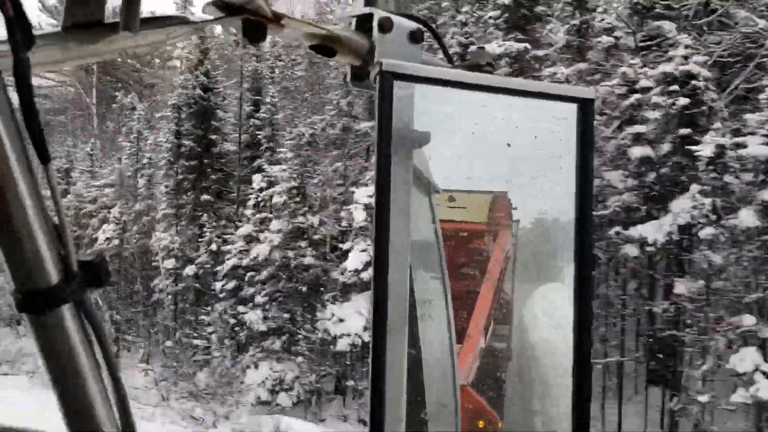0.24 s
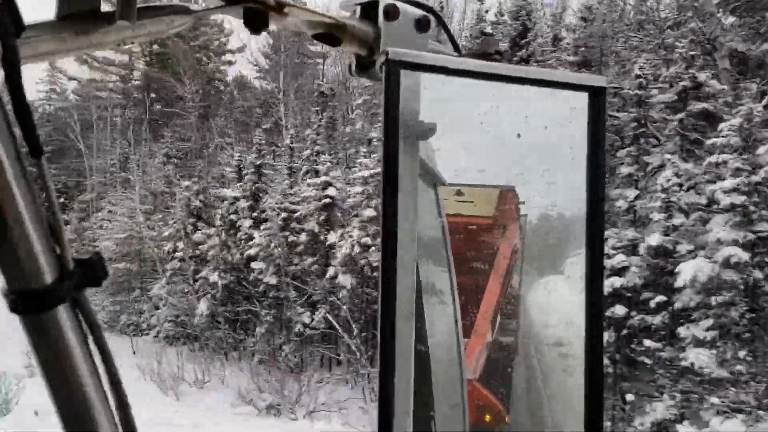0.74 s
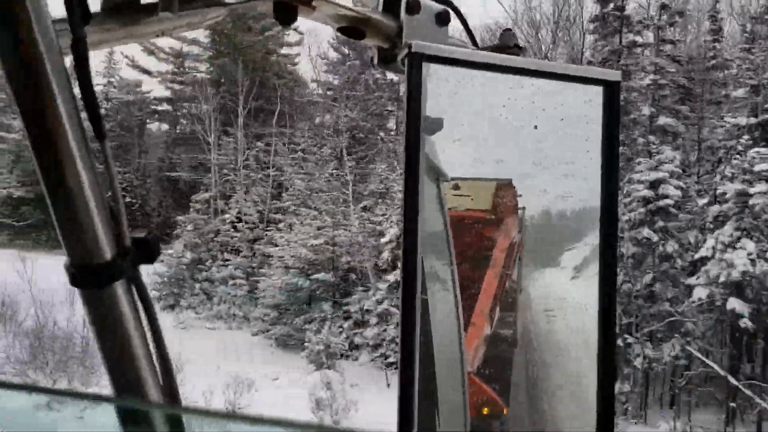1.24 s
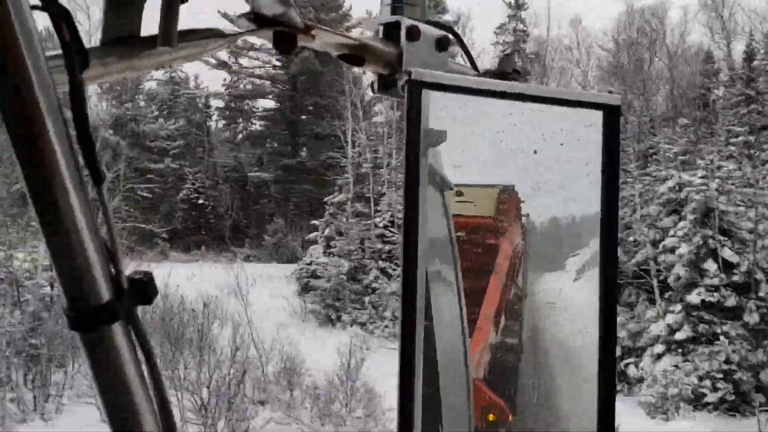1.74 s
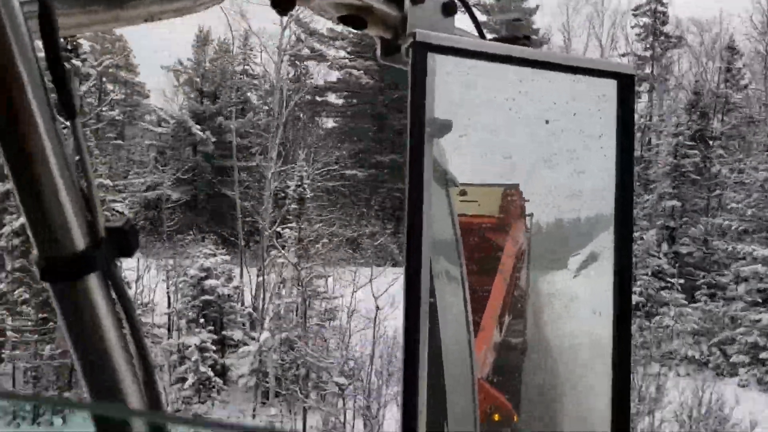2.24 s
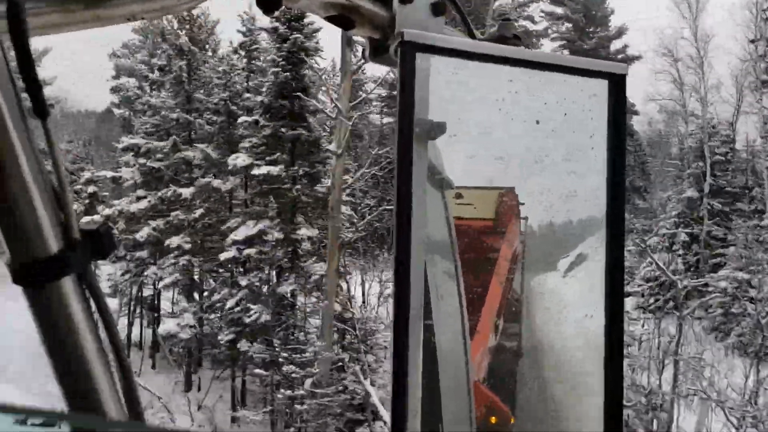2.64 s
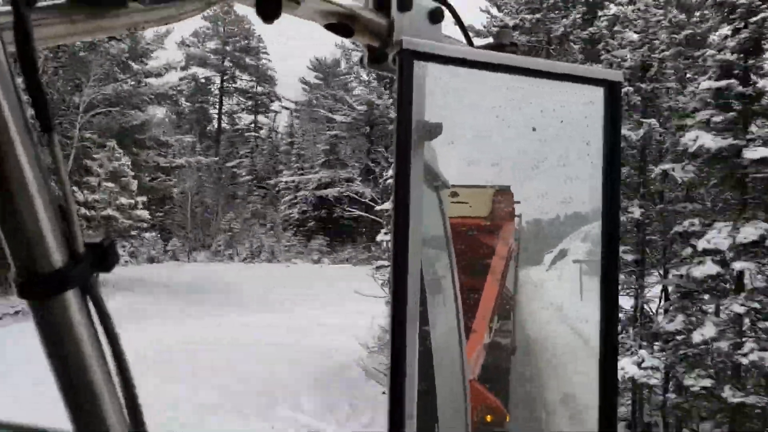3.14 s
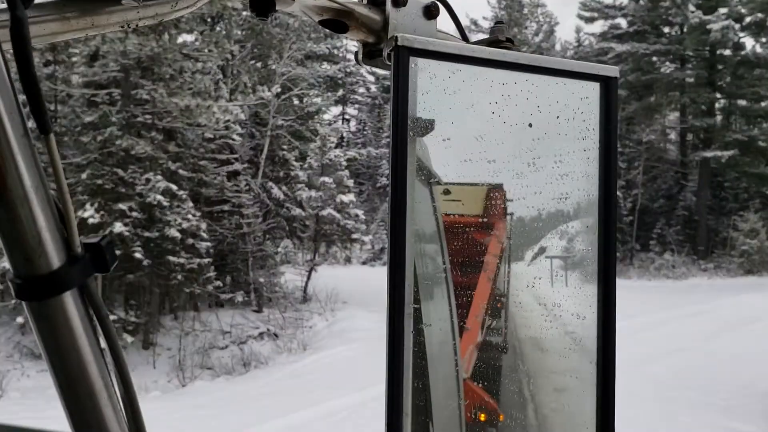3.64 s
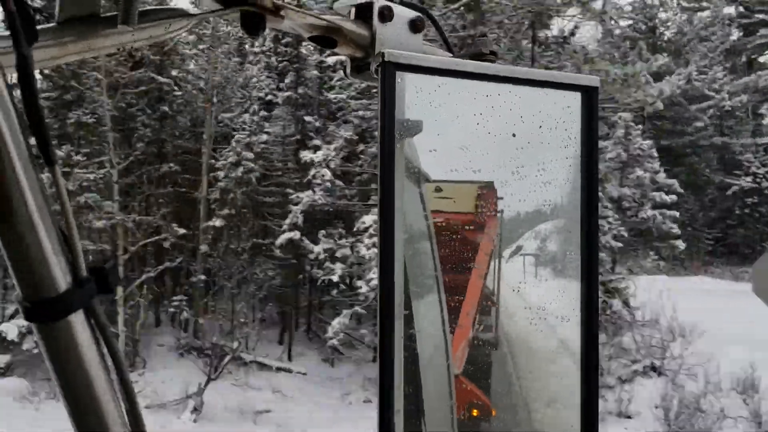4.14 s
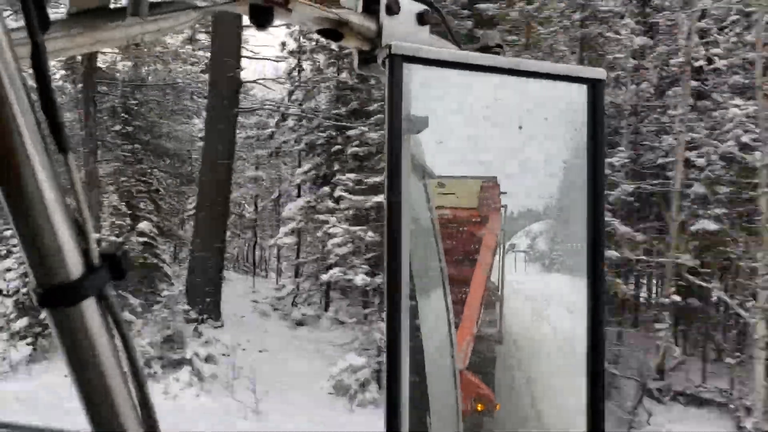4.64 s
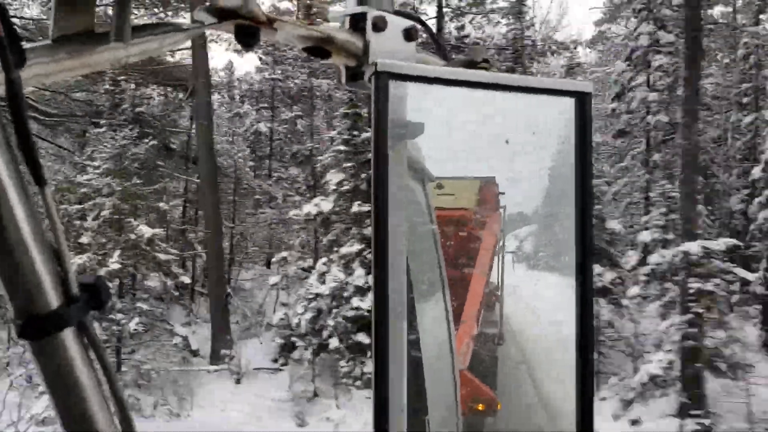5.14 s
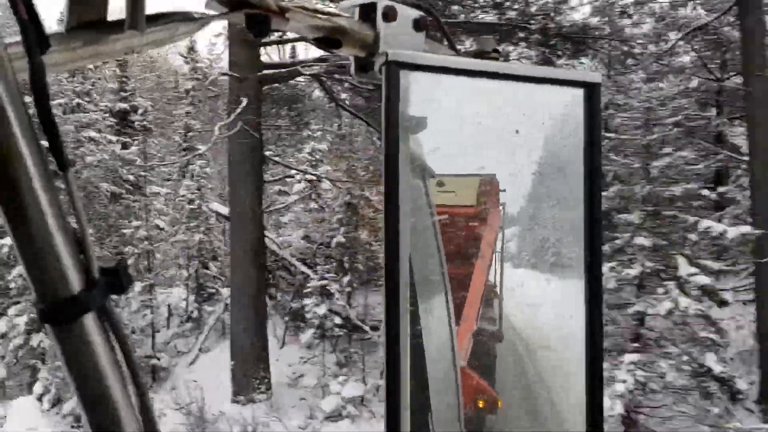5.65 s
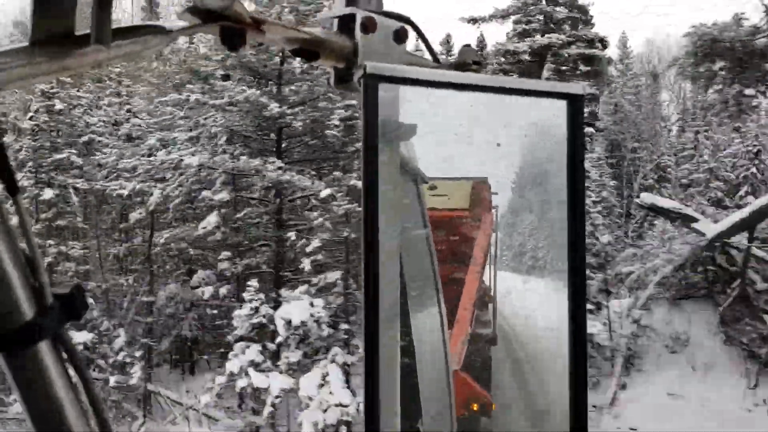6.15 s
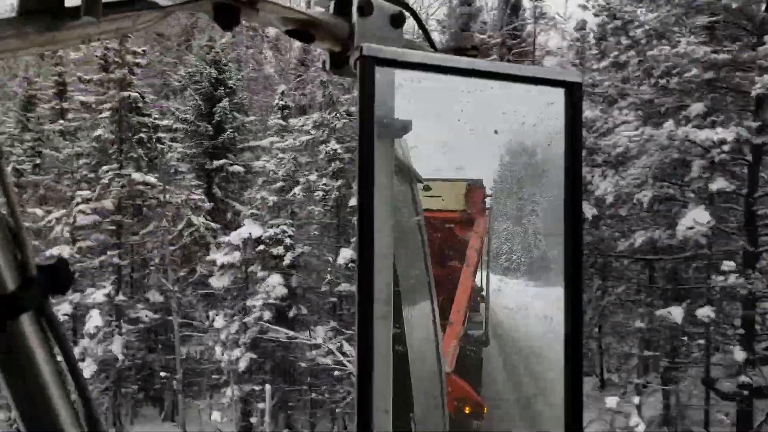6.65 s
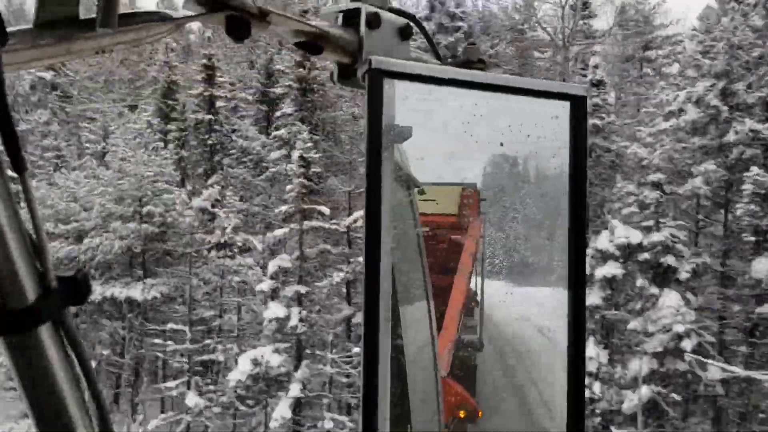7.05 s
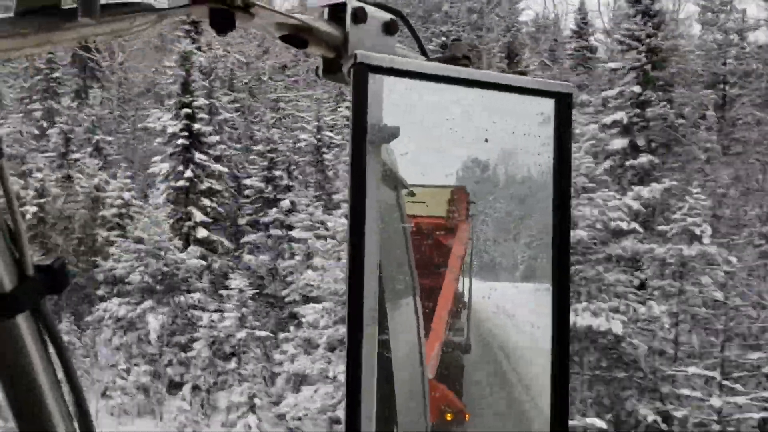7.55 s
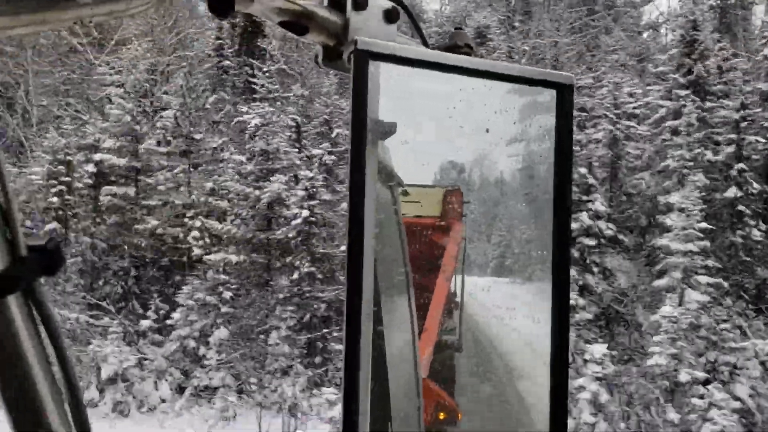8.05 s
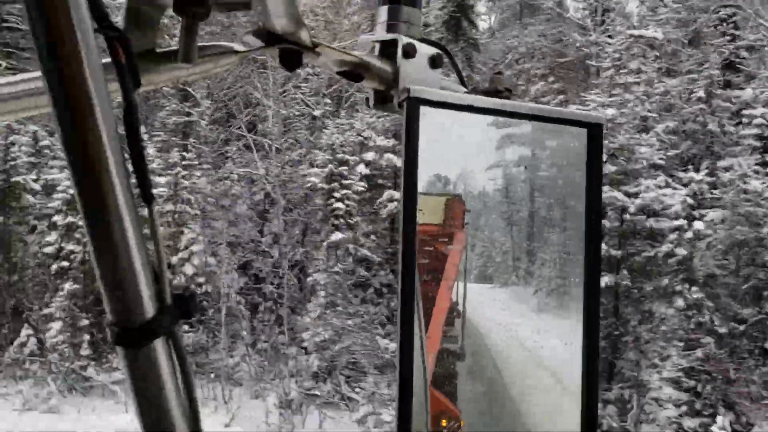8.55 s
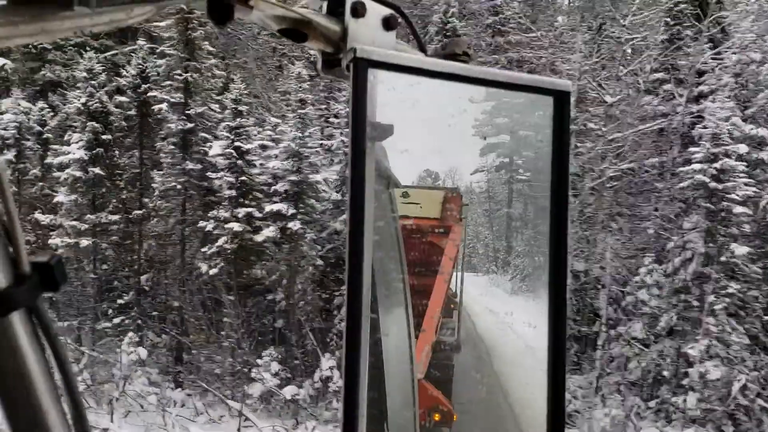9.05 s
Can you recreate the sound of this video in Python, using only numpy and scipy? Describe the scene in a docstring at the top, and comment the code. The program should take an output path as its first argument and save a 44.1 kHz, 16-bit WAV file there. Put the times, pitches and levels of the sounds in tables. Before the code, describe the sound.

A heavy truck's diesel engine is heard from the cab over steady road rumble, clatter and hiss. The engine brake lets go almost at once, and the engine pulls with whining gears and a few pops. It coasts for a moment, then pops again as the brake returns with a loud, rasping throb that rattles panels and loose metal. A thin squeal and short high whistles join at the close.

```python
"""Inside the cab of a heavy six-cylinder diesel truck on a snowy road.
At first the engine brake barks over road rumble, clatter and hiss. It lets go, and the engine pulls with
a smooth drone while the gears whine, pops knock the cab and the turbo's thin whistle sinks. After a short
coast the brake cuts in again with a few pops: uneven blow-downs of compressed air excite the resonances
of exhaust and cab, panels buzz and the turbo climbs. Near the end come a squeal and brief whistles."""
import sys
import numpy as np
from scipy import signal
from scipy.fft import irfft, next_fast_len
from scipy.io import wavfile
from scipy.ndimage import uniform_filter1d

SR = 44100
rng = np.random.default_rng(int(sys.argv[2]) if len(sys.argv) > 2 else 0)


def wav_out(sig):
    """Save sig, one row per channel (or a flat mono array), as 16-bit PCM at SR to the path in sys.argv[1]."""
    wavfile.write(sys.argv[1], SR, np.round(np.clip(np.atleast_2d(sig).T, -1, 1) * 32767).astype(np.int16))


N = 410130
TIME = np.arange(N) / SR

# The sound field in the cab. Each row: frequency in Hz, correlation between the ears.
EAR_CORRELATION = [(30, 1), (130, 0.72), (250, 0.72), (500, 0.73), (1000, -0.077), (3000, 0.055),
                   (12000, -0.065)]
# Its balance. Each row: frequency in Hz, left minus right in dB.
EAR_BALANCE = [(30, 4), (130, -2.5), (500, -1.5), (1000, -3.5), (2000, -3), (12000, -0.5)]
# Noise spectra of road, engine and brake. Each row: frequency in Hz, relative density in dB.
RUMBLE_SPECTRUM = [(25, -12), (50, -5), (90, 1.5), (145, 1), (240, -8.5), (310, -6.5), (420, -13.5),
                   (515, -11.5), (570, -20), (625, -17.5), (720, -18), (810, -14.5), (1100, -29.5),
                   (1600, -32)]
CLATTER_SPECTRUM = [(500, -1), (850, -6.5), (1200, -1), (1600, -1), (2100, -3.5), (2550, -4.5),
                    (2850, -8.5), (3100, -10.5), (3800, -12), (4300, -12.5), (5200, -19), (7300, -27),
                    (8500, -28)]
HISS_SPECTRUM = [(6000, 2), (7300, 2.5), (8600, -10), (10000, -4.5), (11700, 0.5), (13500, -4),
                 (18000, -2.5)]
RASP_SPECTRUM = [(150, -11), (300, 0.5), (420, 4.5), (520, 0), (660, 2), (830, -4), (1200, -23),
                 (1900, -36), (3000, -34.5), (6000, -33)]
# Engine speed. Each row: time in seconds, four-stroke cycles per second.
CYCLE_RATE = [(0, 11.5), (.3, 11.45), (.55, 11.27), (1.7, 11.43), (2.3, 11.65), (3.55, 11.63),
              (3.75, 11.845), (5.25, 12.055), (7.75, 12.51), (8.25, 12.515), (9.3, 12.465)]
# How hard the engine works. Each row: time in seconds, effort in dB (used relative to its median).
ENGINE_EFFORT = [(0.0, -49), (.26, -52.5), (.42, -56), (1.11, -58), (2.2, -53.5), (2.33, -49.5),
                 (2.52, -59.5), (2.8, -65), (3.47, -66), (3.61, -58), (3.71, -52), (3.83, -54.5),
                 (4.35, -55), (5.15, -54), (5.98, -55), (6.95, -54), (7.43, -59), (8.18, -59),
                 (8.57, -55.5), (8.96, -53.5), (9.3, -54)]
# Gear whine, strongest late in the pull. Each row: time in seconds, frequency in Hz, level in dB.
GEAR_WHINE = [(0, 1830, -45), (.55, 1815, -45), (.75, 1840, -40), (1.1, 1840, -42), (1.6, 1842, -38.5),
              (2.1, 1850, -34), (2.35, 1852, -37.5), (2.65, 1850, -45), (2.85, 1848, -51), (3.6, 1850, -53),
              (4.5, 1850, -60)]
# The turbo's whistle. Each row: time in seconds, level in dB.
TURBO_LEVEL = [(0, -66), (.4, -58), (.65, -51), (.95, -57), (1.2, -60), (1.7, -58), (2.12, -48.5),
               (2.7, -55), (2.9, -70), (4, -72), (6.9, -69), (7.5, -70), (9.3, -64)]
# Passing whistles, and late on two broad bands that thicken the turbo's climbing whistle near 7 kHz. Each row:
# start and end in seconds, first and last pitch and width in Hz, level in dB.
WHISTLE_GLIDES = [(.4, 1.2, 11000, 9800, 200, -69), (8.18, 9.3, 6780, 7080, 380, -61),
                  (8.7, 9.3, 6950, 7150, 400, -55), (8.66, 8.74, 2250, 2330, 60, -41),
                  (8.82, 8.88, 2500, 2540, 70, -39), (8.33, 8.8, 4080, 4110, 70, -52),
                  (8.78, 9.3, 4160, 4240, 80, -48.5)]
# A squeal under the brake. Each row: time in seconds, frequency in Hz, level in dB.
SQUEAL_PATH = [(8.35, 2490, -43), (8.46, 2530, -38.5), (8.56, 2490, -40.5), (8.63, 2170, -43)]
# Pops and knocks. Each row: start in seconds, peak of the exciting crack in dB, its cutoff in Hz.
POP_CRACKS = [(0.066, -17, 700), (0.079, -16, 800), (0.099, -16, 800), (0.234, -19, 750), (0.378, -23, 800),
              (0.880, -9, 1300), (0.906, -18, 500), (0.932, -21, 450), (1.069, -20, 750), (1.080, -18, 500),
              (1.096, -17, 550), (1.103, -19, 750), (1.113, -21, 900), (1.368, -19.5, 700),
              (2.098, -20, 450), (2.353, -11.5, 850), (2.365, -14, 550), (2.483, -20, 800),
              (2.735, -27, 600), (2.895, -28, 450), (2.93, -28, 700), (3.101, -29, 700), (3.192, -30, 600),
              (3.386, -28, 500), (3.461, -28, 450), (3.579, -27, 800), (3.612, -25, 600),
              (3.637, -14.5, 1000), (3.663, -11.5, 900), (3.681, -17, 750), (3.705, -7, 900),
              (3.714, -15, 1000), (3.746, -16, 700), (6.562, -18, 1200), (7.338, -19, 900),
              (8.999, -17, 850)]
# Resonances of the cab's body. Each row: frequency in Hz, width in Hz, boost in dB.
BODY_MODES = [(109, 60, 7), (215, 79, 15), (315, 67, 5), (425, 92, 10.5), (510, 21, 4), (607, 35, 7.5),
              (800, 90, 3), (1270, 71, 1)]
# Resonances of a loose metal fitting. Each row: frequency in Hz, width in Hz, relative level in dB.
FITTING_MODES = [(1890, 95, 0), (2020, 130, -6)]
# Its rattle. Each row: time in seconds, level in dB.
FITTING_LEVEL = [(0, -41), (3.7, -37), (4.2, -42.5), (5, -43), (6, -40.5), (7, -41), (7.6, -44.5),
                 (8.5, -43), (9.1, -36.5), (9.3, -38)]
# Panel tones. Each row: start and end in seconds, multiple of the cycle rate, dB at median effort.
PANEL_TONES = [(3.85, 4.25, 34, -30.5), (7.2, 11, 40, -38), (7.446, 9.299, 18, -28)]
# Buzzing panels. Each row: frequency in Hz, width in Hz, relative level in dB, build-up in seconds.
PANEL_MODES = [(809, 40, 3.5, 0.001), (1075, 78, -2, .0013), (1350, 90, -2, 0.0017),
               (2415, 310, -5.5, 0.0055), (3134, 110, -12.5, 0.0036), (3800, 72, -15, .005),
               (4630, 700, -12.5, 0.0054), (7500, 270, -21.5, .007), (12100, 710, -17.5, .007)]
# Cylinders in firing order. Each row: lateness as a share of the firing interval, relative level in dB,
# nominal blow-down time in seconds, relative rasp in dB.
CYLINDERS = [(-.02, 1.8, .00056, 2.5), (.007, 1.5, .00068, 1.5), (.091, -11, .00105, -16),
             (-.027, -1.6, .00092, -4), (-.053, -7.5, .00075, -16), (.007, -4.3, .0013, -3.5)]
# Resonances and notches of exhaust pipe and cab air. Each row: frequency in Hz, width in Hz, boost in dB.
PIPE_MODES = [(63.8, 14.1, 24), (105.5, 4.4, 17.5), (135.7, 7.9, 4.5), (139, 30.3, 20), (147.75, 9.5, -9),
              (185.6, 3.2, -8), (194.7, 169, 14.5), (246.9, 5.3, -26), (293.5, 174, 11), (371, 53, -2.5),
              (425, 28, 6.5), (439.2, 9, 6), (495, 20, 4), (580, 55, 0), (632, 17, 11.5), (815, 64, -4.5)]
# The brake's character. Each row: time in seconds, sharpness (divides the blow-down times),
# unevenness (scales the cylinders' relative levels), rasp in dB.
BRAKE_BITE = [(0, 0.82, 0.57, -43), (3.7, 1.27, 0.1, -19.5), (4.1, 0.6, 0.34, -24.5), (5, 1.06, 0.52, -23),
              (6.3, 1.04, 1.06, -20), (7.8, 1.63, 0.83, -22.5), (8.9, 1.65, 0.88, -26.5)]
# Spells of engine braking. Each row: on and off time in seconds.
BRAKE_SPELLS = [(-1, .24), (3.64, 9.3)]
# Each entry: base level of one braking spell in dB.
BRAKE_SPELL_DB = [-16, -11]

BRAKE_ATTACK_S, BRAKE_RELEASE_S = .14, .19
PULL_ON_S, PULL_OFF_S, PULL_ATTACK_S = .33, 2.33, .089
WHISTLE_FADE_S = .06


def from_db(db):
    """Amplitude ratio of a level in decibels."""
    return np.exp(np.asarray(db) * (np.log(10) / 20))


def rms_one(x):
    """Normalisation to unit power."""
    return x / np.sqrt(np.mean(x ** 2) + 1e-20)


def in_time(rows):
    """Linear interpolation of each column at every sample."""
    times, *columns = np.transpose(rows)
    return [np.interp(TIME, times, column) for column in columns]


def at_hz(points, hz):
    """Interpolation on a logarithmic frequency axis."""
    known_hz, value = np.transpose(points)
    return np.interp(np.log(hz), np.log(known_hz), value)


def spell(on, off, attack_s, release_s):
    """Trapezoidal envelope: it rises from the on time, holds at one and falls from the off time."""
    return np.clip((TIME - on) / attack_s, 0, 1) * np.clip(1 - (TIME - off) / release_s, 0, 1)


def puff(age, rise_s):
    """Critically damped pulse: pressure jumps up and bleeds away."""
    return age / rise_s * np.exp(1 - age / rise_s)


def swell(clicks, rise_s):
    """Superposition: each click starts a critically damped pulse of its own height."""
    pole = np.exp(-1 / (rise_s * SR))
    return signal.lfilter([np.e * (1 - pole)], [1, -2 * pole, pole * pole], clicks + 1e-18)


def butter(x, hz, kind, order=2):
    """Butterworth filter, maximally flat in its passband."""
    return signal.sosfilt(signal.butter(order, hz, kind, fs=SR, output="sos"), x + 1e-18)


def resonate(x, modes):
    """Second-order resonances in series: each is a peak, or a notch if its boost is negative."""
    for hz, width_hz, boost_db in modes:
        gain, half = from_db(boost_db / 2), np.pi * width_hz / SR
        tuning = -2 * np.cos(2 * np.pi * hz / SR)
        zeros = [1 + half * gain, tuning, 1 - half * gain]
        poles = [1 + half / gain, tuning, 1 - half / gain]
        x = signal.lfilter(zeros, poles, x)
    return x


def drift(rate_hz, step=40, settle=2000):
    """Random modulation: low-passed noise of unit power."""
    pole = np.exp(-2 * np.pi * step * rate_hz / SR)
    noise = rng.standard_normal(N // step + settle + 2)
    slow = signal.lfilter([1], [1, -2 * pole, pole * pole], noise)[settle:]
    return np.interp(np.arange(N) / step, np.arange(len(slow)), rms_one(slow))


def pan(db):
    """Interaural level difference: two gains, left minus right in dB."""
    return from_db(np.array([[1], [-1]]) * db / 2)


def left_late(x, lag_s, echo_s=.017, echo_db=-17):
    """Interaural delay: the right ear leads, and a cross-cab echo meets the ears in opposite phase."""
    echo = from_db(echo_db) * np.interp(TIME - echo_s, TIME, x)
    return np.array([np.interp(TIME - lag_s, TIME, x) + echo, x - echo])


def cab(x, wet_db, t60=0.032, low_hz=470):
    """Reverberation: bass fills the cab evenly; higher up, dense reflections differ at each ear."""
    t = TIME[:SR // 6]
    tail = rng.standard_normal((2, len(t))) * from_db(-60 * t / t60)
    tail = butter(tail / np.sqrt(np.sum(tail[0] ** 2)), low_hz, "high", order=4)
    return x + from_db(wet_db) * signal.fftconvolve(np.atleast_2d(x), tail, axes=1)[:, :N]


def noise_field(spectrum):
    """Partial coherence: coloured noise, alike at both ears in the bass and diffuse in the treble."""
    size = next_fast_len(N, real=True)
    hz = np.maximum(np.arange(size // 2 + 1) * SR / size, 1)
    low, high = spectrum[0][0], spectrum[-1][0]
    gain = from_db(at_hz(spectrum, hz)) / np.sqrt((1 + (low / hz) ** 8) * (1 + (hz / high) ** 8))
    mid, side = rng.standard_normal((2, 2 * len(hz))).view(complex)
    alike = np.clip(at_hz(EAR_CORRELATION, hz), -1, 1)
    pair = np.sqrt(1 + alike) * mid + np.sqrt(1 - alike) * side * np.array([[1], [-1]])
    out = irfft(gain * pair * pan(at_hz(EAR_BALANCE, hz)), size)[:, :N]
    return out / np.std(out.mean(axis=0))


def narrow_band(hz, width_hz, steady=0):
    """Quadrature modulation: noise around a moving pitch, with a pure core of relative height steady."""
    phase = 2 * np.pi * np.cumsum(hz) / SR
    cos, sin = np.cos(phase), np.sin(phase)
    ears = [(steady + drift(width_hz)) * a + drift(width_hz) * b for a, b in ((cos, sin), (sin, cos))]
    return np.array(ears) / np.sqrt(1 + steady ** 2 / 2)


def crank(zero_s=6.1155):
    """Phase as the integral of speed: engine cycles, whole when the first cylinder is due."""
    cycles = np.cumsum(in_time(CYCLE_RATE)[0]) / SR
    return cycles - np.interp(zero_s, TIME, cycles)


def valve_timing(cycles, jitter_s=0.00016):
    """A nearly periodic train: per sample, the last opening's age in seconds, cylinder and serial."""
    count = len(CYLINDERS)
    turn = np.arange(np.ceil(cycles[0] * count), cycles[-1] * count).astype(int)
    lateness = np.array(CYLINDERS)[turn % count, 0]
    opens_s = np.interp((turn + lateness) / count, cycles, TIME)
    opens_s = np.sort(opens_s + jitter_s * rng.standard_normal(len(turn)))
    serial = np.maximum(np.searchsorted(opens_s, TIME) - 1, 0)
    return np.maximum(TIME - opens_s[serial], 0), turn[serial] % count, serial


def openings(age):
    """Impulse train: a unit click wherever a valve opens."""
    return 1.0 * (np.diff(age, prepend=0) < 0)


def scatter(serial, spread_db):
    """Cycle-to-cycle variation: a random level in dB, held from one opening to the next."""
    return spread_db * rng.standard_normal(serial[-1] + 1)[serial]


def road(effort_db, braking, knocks_per_s=11):
    """Structure-borne noise: tyres and chassis rumble with load; loose parts knock, less when braking."""
    knocks = (rng.random(N) < knocks_per_s / SR) * from_db(rng.normal(0, 1.4, N))
    shake = signal.fftconvolve(knocks, puff(TIME[:SR // 20], rise_s=0.0022))[:N]
    rattle = shake * rms_one(butter(rng.standard_normal((2, N)), [280, 1000], "band"))
    rumble = from_db(1.2 * drift(3.4)) * noise_field(RUMBLE_SPECTRUM)
    level = from_db(-25 + 0.7 * effort_db + 2 * braking)
    return level * (rumble + from_db(-3 - 6 * braking) * rattle)


def engine_bay(effort_db, braking, age, cylinder, serial, depth=0.11, surge_db=1.1, burning_db=1):
    """Amplitude modulation: clatter and hiss swell after each firing and grow with effort."""
    strength = from_db(np.array(CYLINDERS)[cylinder, -1] + scatter(serial, spread_db=3))
    knocks = swell(rms_one(strength) * openings(age), rise_s=0.005)
    beat = rms_one(1 + depth * knocks) * from_db(surge_db * drift(17))
    fuel_cut_db = -4 * braking
    clatter = from_db(-36 + 0.88 * effort_db + fuel_cut_db) * noise_field(CLATTER_SPECTRUM)
    hiss = from_db(-54 + 0.71 * effort_db) * noise_field(HISS_SPECTRUM)
    pulling = spell(PULL_ON_S, PULL_OFF_S, PULL_ATTACK_S, release_s=0.025)
    return from_db(burning_db * pulling) * beat * (clatter + hiss)


def gear_whine():
    """Gear-mesh tone: one metallic pitch with narrow noise sidebands."""
    hz, level_db = in_time(GEAR_WHINE)
    return from_db(level_db) * narrow_band(hz, width_hz=32, steady=1.25) * pan(-4.5)


def turbo(top_hz=6300, idle_hz=3400, run_down_s=1.7, rise_hz_per_s=660):
    """Pitch follows rotor speed: it decays towards idle off the brake, then climbs under braking."""
    released_s = np.maximum(TIME - BRAKE_SPELLS[0][1], 0)
    braked_s = np.maximum(TIME - BRAKE_SPELLS[1][0], 0)
    hz = idle_hz + (top_hz - idle_hz) * np.exp(-released_s / run_down_s) + rise_hz_per_s * braked_s
    level_db, = in_time(TURBO_LEVEL)
    return from_db(level_db) * narrow_band(hz, width_hz=60)


def whistles(flutter_db=1.5, wander=.002):
    """Narrow-band noise: thin tones sing for a moment, fading in, gliding and fading out; late on, two of them
    thicken the turbo's climbing whistle."""
    out = 0
    for start, end, first_hz, last_hz, width_hz, level_db in WHISTLE_GLIDES:
        hz = np.interp(TIME, [start, end], [first_hz, last_hz]) * (1 + wander * drift(9.7))
        gate = spell(start, end, WHISTLE_FADE_S, WHISTLE_FADE_S)
        out += gate * from_db(level_db + flutter_db * drift(3.1)) * narrow_band(hz, width_hz)
    return out


def squeal(waver=.008):
    """Frequency modulation: a thin, raspy tone wavers, then bends down as it dies."""
    hz, level_db = in_time(SQUEAL_PATH)
    gate = spell(SQUEAL_PATH[0][0], SQUEAL_PATH[-1][0], WHISTLE_FADE_S, WHISTLE_FADE_S)
    return gate * from_db(level_db) * narrow_band(hz * (1 + waver * drift(25)), width_hz=75, steady=1)


def pops():
    """Impact excitation: each crack, as bright as its contact is hard, sets the cab's body ringing."""
    cracks, click = np.zeros(N), signal.unit_impulse(SR // 100)
    for start_s, peak_db, top_hz in POP_CRACKS:
        crack, at = butter(click, top_hz, "low", order=6), int(start_s * SR)
        cracks[at:at + len(crack)] += from_db(peak_db) * crack / crack.max()
    ringing = resonate(butter(cracks, 110, "high"), BODY_MODES)
    return cab(ringing, wet_db=0) * pan(-2.5)


def loose_fitting(age, cylinder, serial, scatter_db=3.5, right_lag_s=.00012):
    """Free vibration: a metal fitting pings after each strong blow-down, never twice alike."""
    taps = openings(age) * from_db(.75 * np.array(CYLINDERS)[cylinder, -1])
    out, count = 0, serial[-1] + 1
    for hz, width, db in FITTING_MODES:
        chance_db = scatter_db * (rng.standard_normal(count) + .5 * rng.standard_normal((2, count)))
        pings = butter(taps * from_db(chance_db)[:, serial], [hz - width / 2, hz + width / 2], "band")
        out += from_db(db) * rms_one(pings)
    level_db, = in_time(FITTING_LEVEL)
    ears = np.array([out[0], np.interp(TIME - right_lag_s, TIME, out[1])])
    return from_db(level_db) * ears * pan(-1)


def singing_panels(cycles, effort_db, fade_s=0.1, wander_rad=0.65):
    """Sympathetic vibration: cab panels sing along with single engine overtones, swelling with effort."""
    out = 0
    for start, end, multiple, level_db in PANEL_TONES:
        level = spell(start, end, fade_s, fade_s) * from_db(level_db + effort_db - 0.5 * drift(11))
        out += level * np.sin(2 * np.pi * multiple * cycles + wander_rad * drift(1.2))
    return out * pan(-2.5)


def exhaust_drone(cycles, effort_db, braking, pull_db=-19.5, coast_db=-33.5):
    """Harmonics of the firing rate, chiefly the second: strong when pulling, faint when coasting."""
    firing_phase = 2 * np.pi * len(CYLINDERS) * cycles
    tone = np.sin(2 * firing_phase + 0.15 * drift(3.6)) + from_db(-13) * np.sin(firing_phase)
    pulling = spell(PULL_ON_S, PULL_OFF_S, PULL_ATTACK_S, release_s=0.053)
    coasting = (1 - pulling) * (1 - braking)
    level = pulling * from_db(pull_db) + coasting * from_db(coast_db)
    return level * from_db(0.27 * effort_db - 1.9 * drift(7.3)) * tone * pan(0.66)


def panel_buzz(blows):
    """Forced vibration: each blow shakes the panels, which build up and ring in their own bands."""
    noise, out = rng.standard_normal((2, N)), 0
    for k, (hz, width, db, rise_s) in enumerate(PANEL_MODES):
        ringing = butter(noise * swell(blows, rise_s), [hz - width / 2, hz + width / 2], "band", order=1)
        out += (-1) ** k * from_db(db) * rms_one(ringing)
    return out * pan(-1.1)


def valve_cracks(age, force):
    """Pressure transient: the steep front of each blow-down hits the cab as a short, hard bark."""
    front = butter(force * puff(age, rise_s=0.00013), [370, 1050], "band", order=3)
    return rms_one(cab(left_late(front, lag_s=0.00033), wet_db=-5, t60=0.027)) * pan(-1.4)


def exhaust_boom(pulses):
    """Air-column resonance: pressure pulses drive the modes of exhaust pipe and cab."""
    boom = resonate(butter(pulses, 58, "high", order=4), PIPE_MODES)
    boom = boom / np.sqrt(uniform_filter1d(boom ** 2, SR // 2))  # evens the power, keeps the throb
    return cab(left_late(boom, lag_s=0.00032), wet_db=3.5) * pan(-0.11)


def engine_brake(effort_db, age, cylinder, serial, grab_db=2, settle_s=1.73):
    """Blow-down: each cylinder dumps compressed air into the exhaust, with boom, rasp, buzz and crack."""
    level = grab = 0
    for (on, off), spell_db in zip(BRAKE_SPELLS, BRAKE_SPELL_DB):
        level += spell(on, off, BRAKE_ATTACK_S, BRAKE_RELEASE_S) * from_db(spell_db + 0.97 * effort_db)
        grab += (TIME > on) * np.exp(-np.abs(TIME - on) / settle_s)  # the brake grabs harder at first
    sharpness, unevenness, rasp_db = in_time(BRAKE_BITE)
    _, own_db, blow_s, own_rasp_db = np.array(CYLINDERS)[cylinder].T
    pulse_db = own_db * unevenness + scatter(serial, spread_db=1.25)
    boom = exhaust_boom(puff(age, blow_s / sharpness) * from_db(pulse_db))
    force = from_db(own_rasp_db + scatter(serial, spread_db=2))
    rasp = rms_one(force * puff(age, rise_s=0.0017) + .06) * noise_field(RASP_SPECTRUM)
    buzz = panel_buzz(force * openings(age))
    bark = from_db(-2.5) * rasp + from_db(-9.5) * buzz + from_db(-1.5) * valve_cracks(age, force)
    return level * (from_db(grab_db * grab) * boom + from_db(rasp_db) * bark)


def scene():
    """Superposition of all sources: one crankshaft times the pulses; effort and braking weight them."""
    cycles = crank()
    valves = valve_timing(cycles)
    effort_db, = in_time(ENGINE_EFFORT)
    effort_db -= np.median(effort_db)
    braking = sum(spell(on, off, BRAKE_ATTACK_S, BRAKE_RELEASE_S) for on, off in BRAKE_SPELLS)
    brake = engine_brake(effort_db, *valves)
    tones = singing_panels(cycles, effort_db) + exhaust_drone(cycles, effort_db, braking)
    machinery = engine_bay(effort_db, braking, *valves) + gear_whine()
    machinery += braking * loose_fitting(*valves) + turbo()
    return brake + tones + machinery + road(effort_db, braking) + whistles() + squeal() + pops()


def record(dry, stopband_hz=16550):
    """Soft saturation rounds the tallest peaks; a steep low-pass removes the highest treble."""
    rounded = dry / (1 + dry ** 4) ** .25
    return signal.sosfilt(signal.cheby2(16, 70, stopband_hz, fs=SR, output="sos"), rounded)


dry = scene()
out = record(dry)
wav_out(out)
```